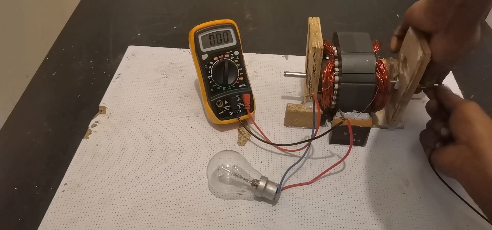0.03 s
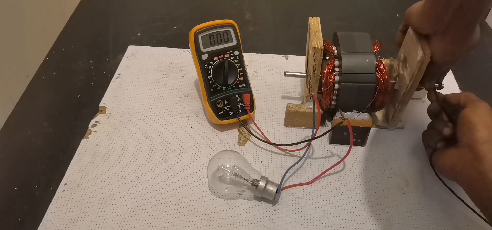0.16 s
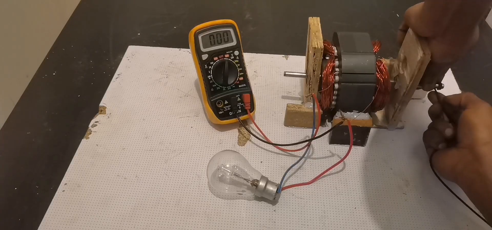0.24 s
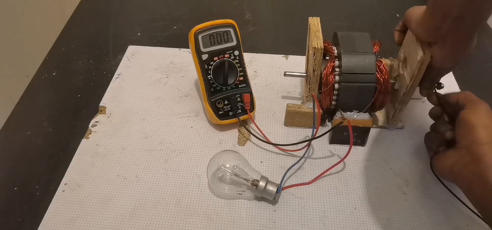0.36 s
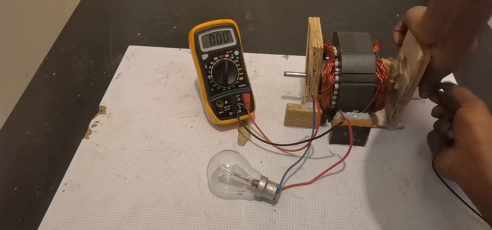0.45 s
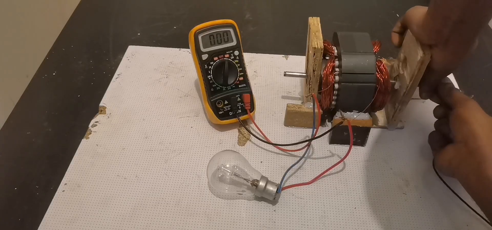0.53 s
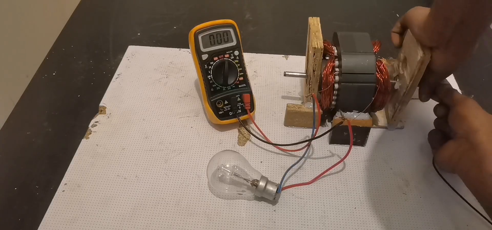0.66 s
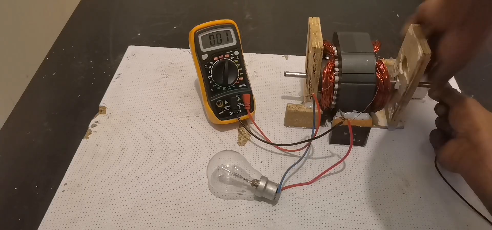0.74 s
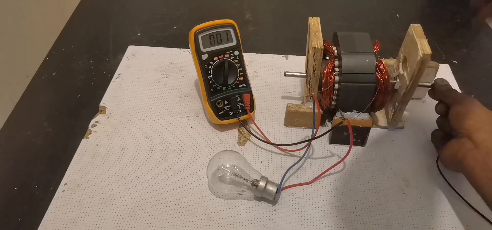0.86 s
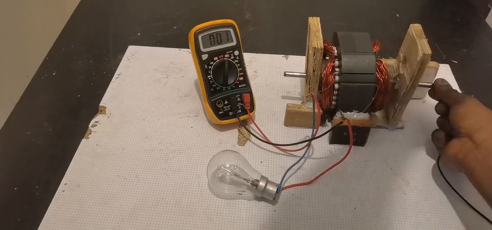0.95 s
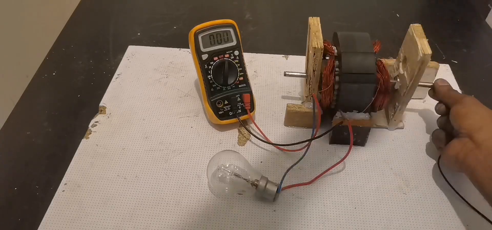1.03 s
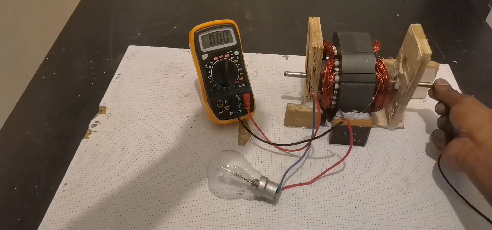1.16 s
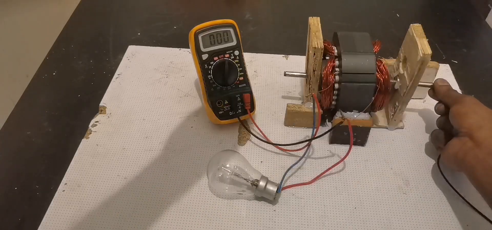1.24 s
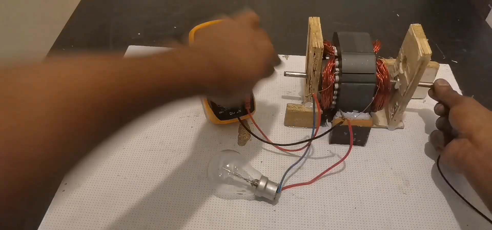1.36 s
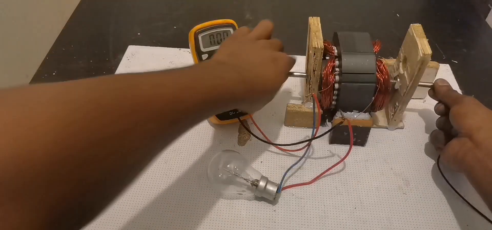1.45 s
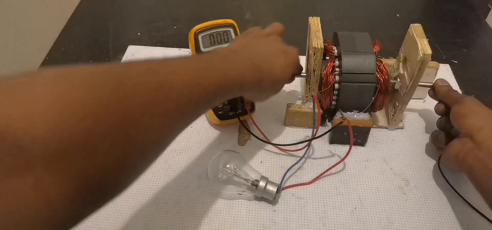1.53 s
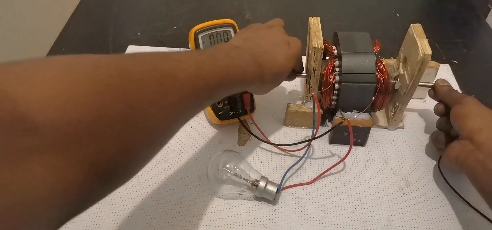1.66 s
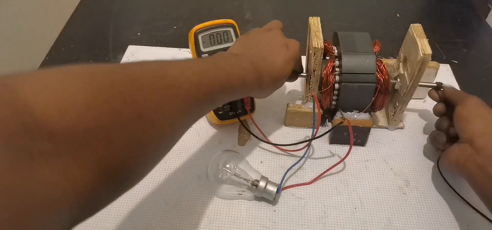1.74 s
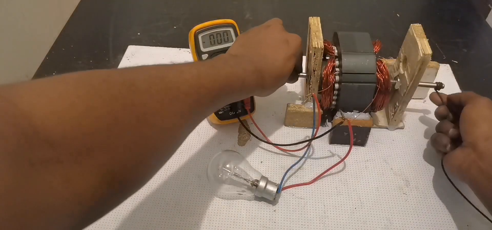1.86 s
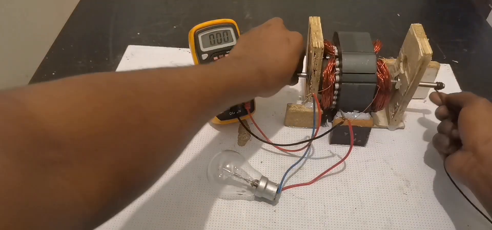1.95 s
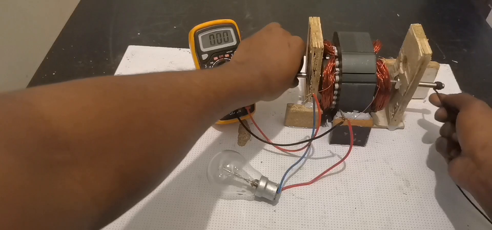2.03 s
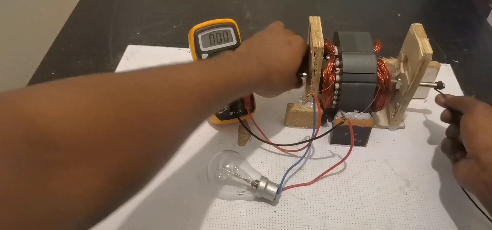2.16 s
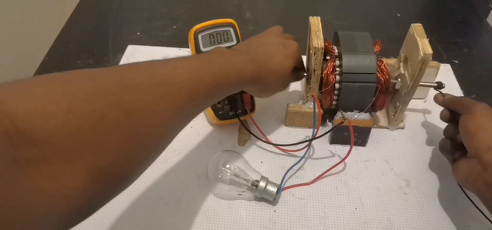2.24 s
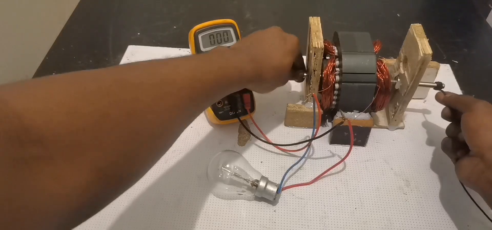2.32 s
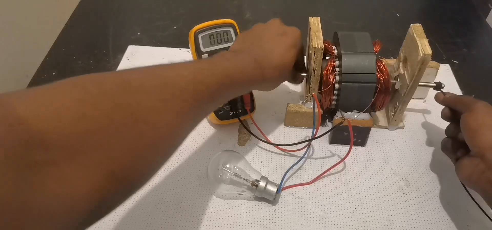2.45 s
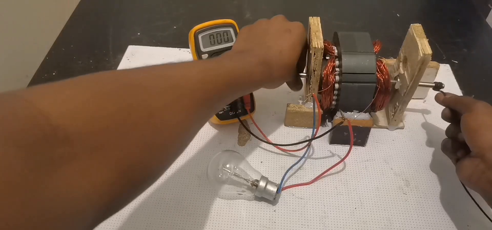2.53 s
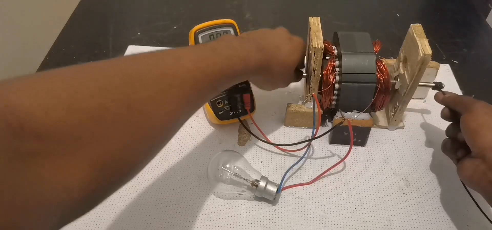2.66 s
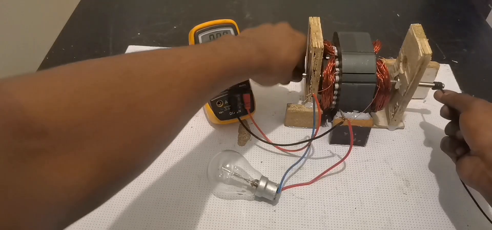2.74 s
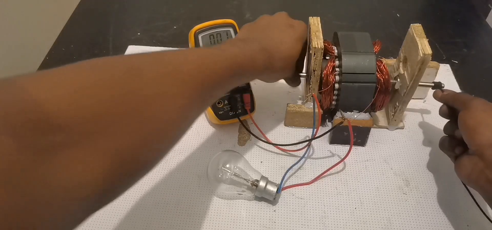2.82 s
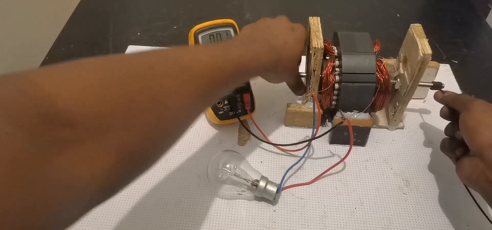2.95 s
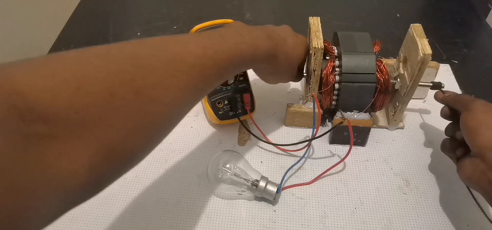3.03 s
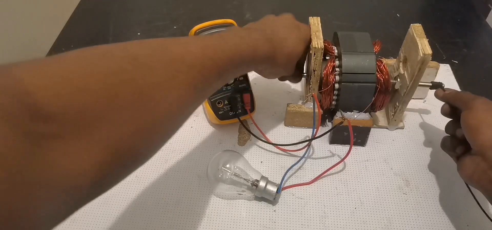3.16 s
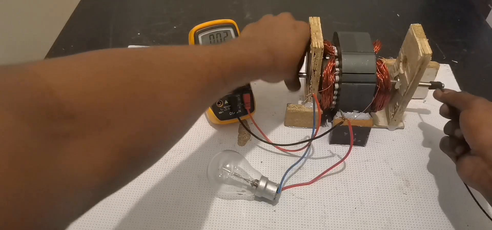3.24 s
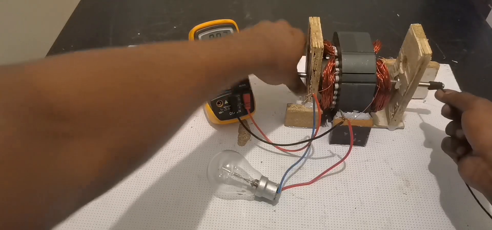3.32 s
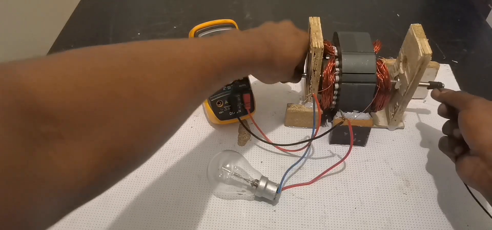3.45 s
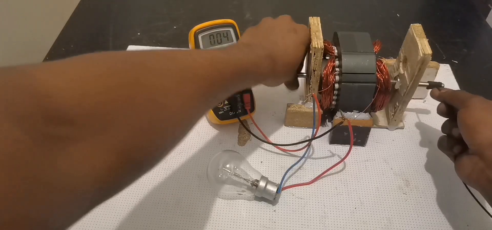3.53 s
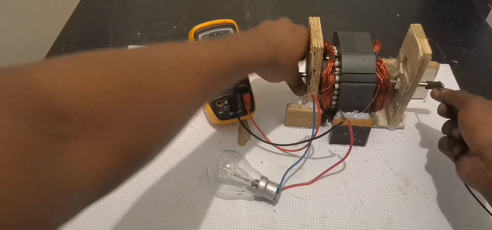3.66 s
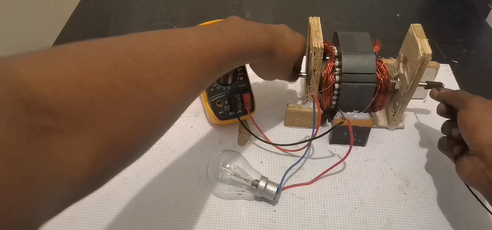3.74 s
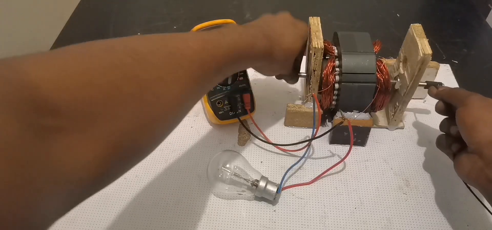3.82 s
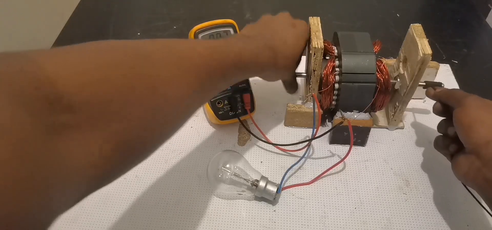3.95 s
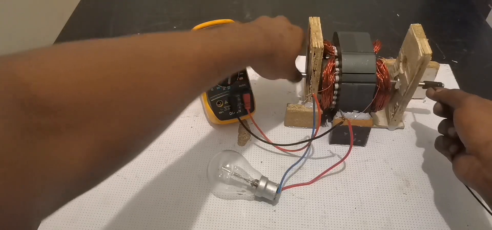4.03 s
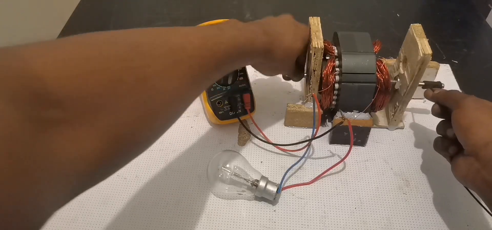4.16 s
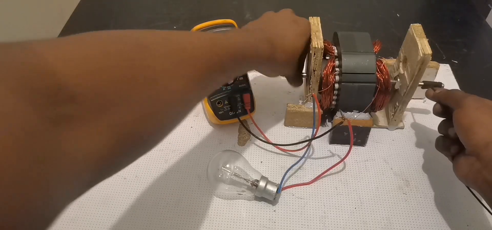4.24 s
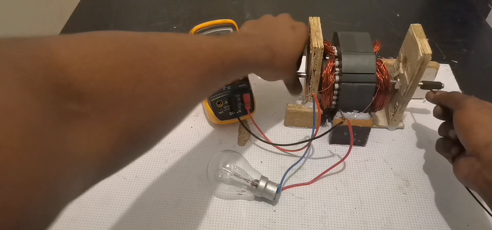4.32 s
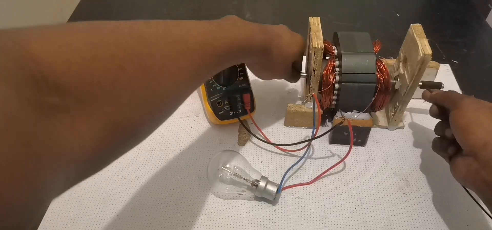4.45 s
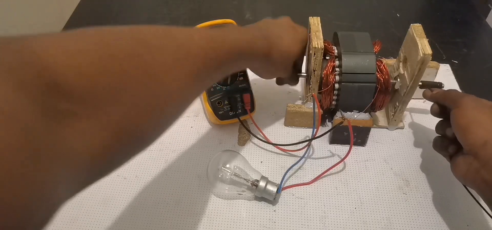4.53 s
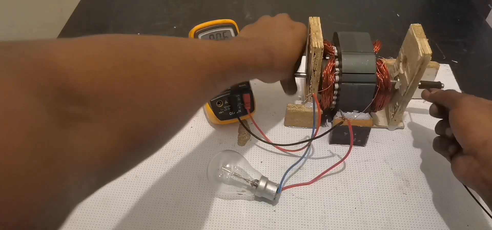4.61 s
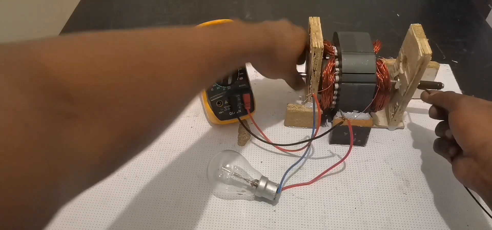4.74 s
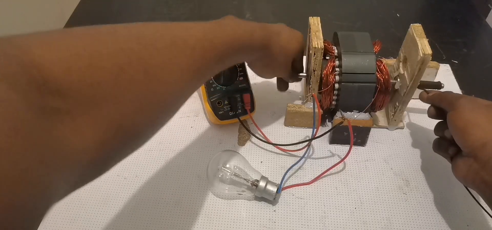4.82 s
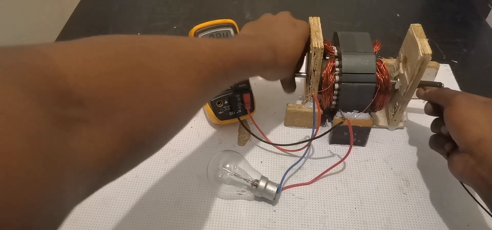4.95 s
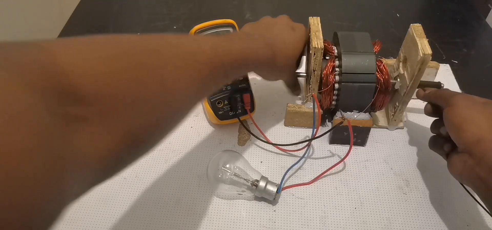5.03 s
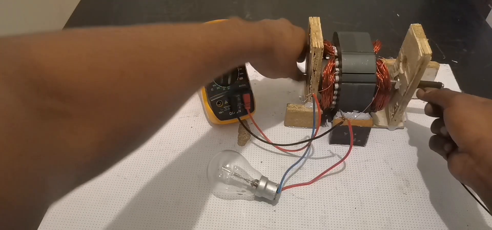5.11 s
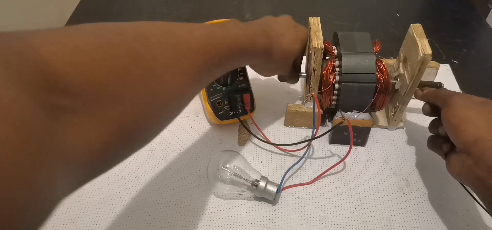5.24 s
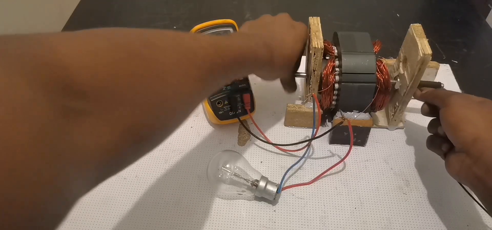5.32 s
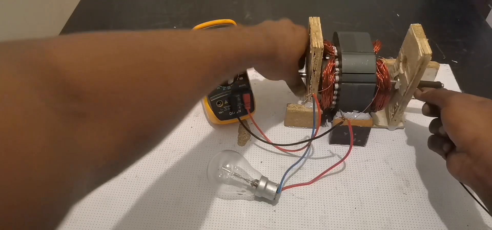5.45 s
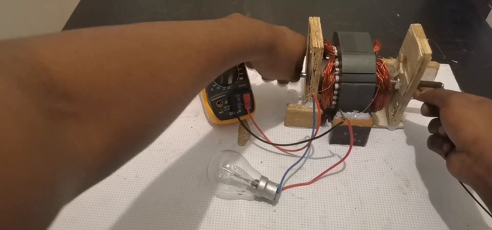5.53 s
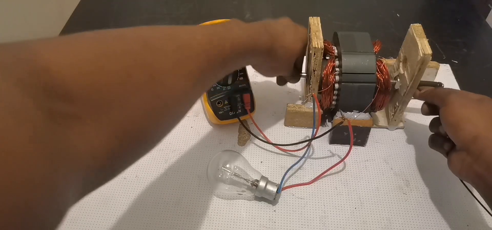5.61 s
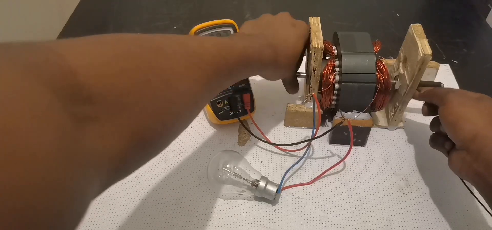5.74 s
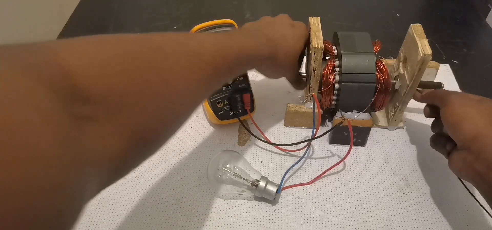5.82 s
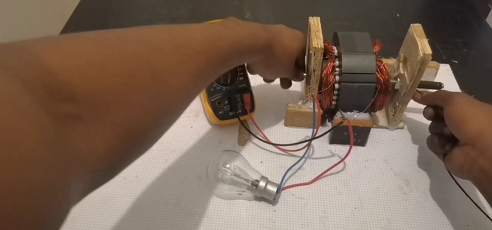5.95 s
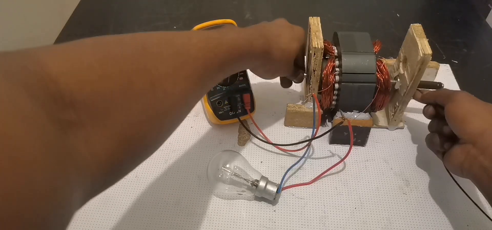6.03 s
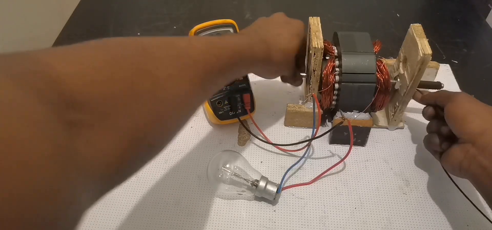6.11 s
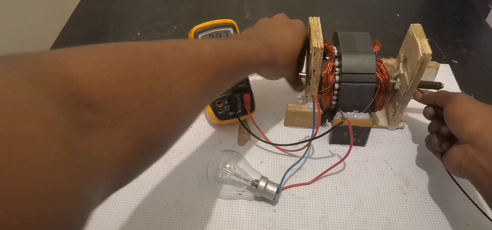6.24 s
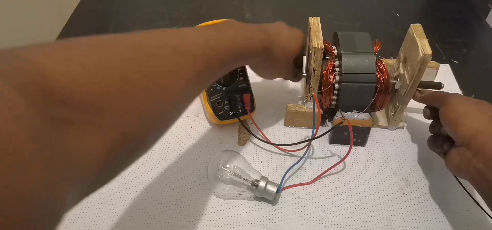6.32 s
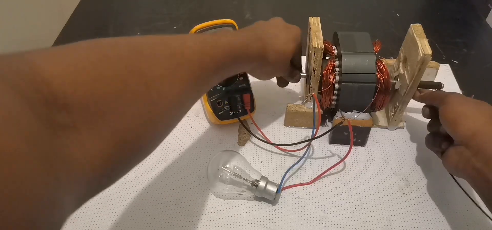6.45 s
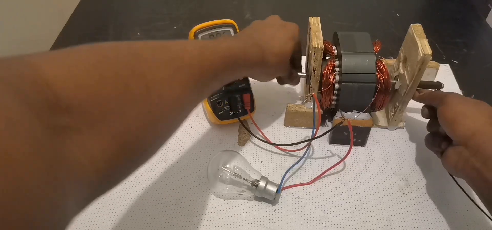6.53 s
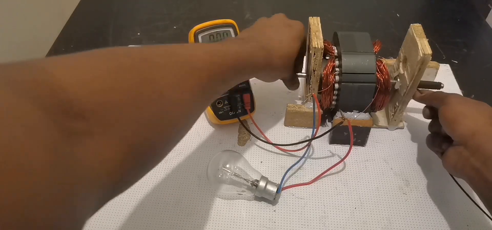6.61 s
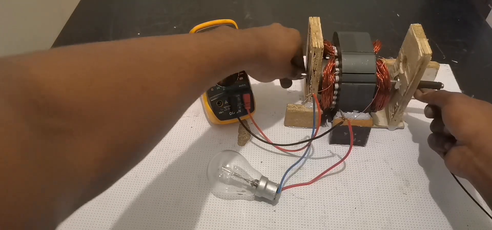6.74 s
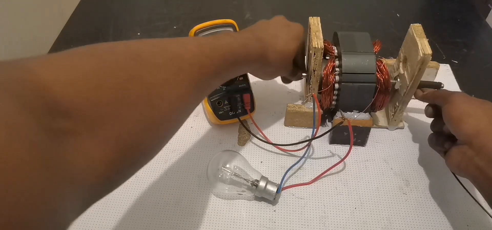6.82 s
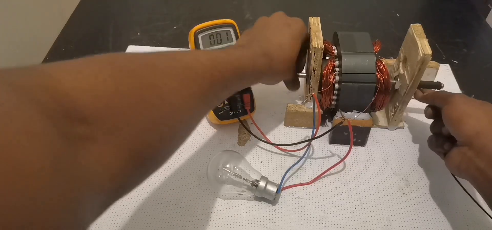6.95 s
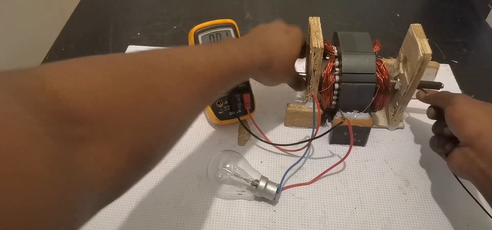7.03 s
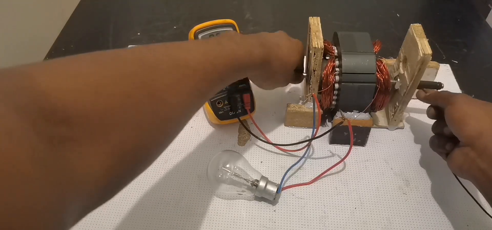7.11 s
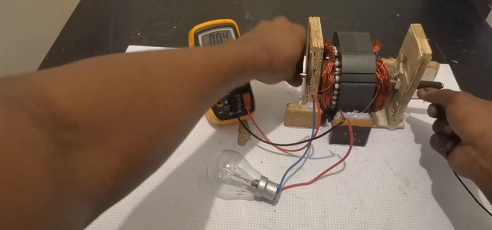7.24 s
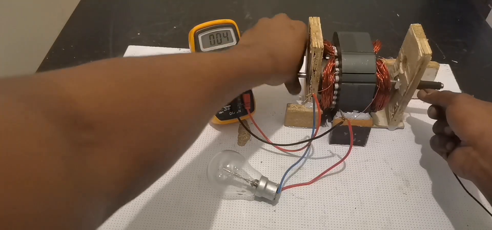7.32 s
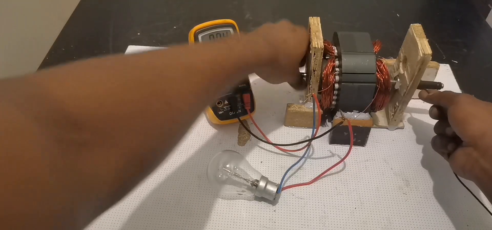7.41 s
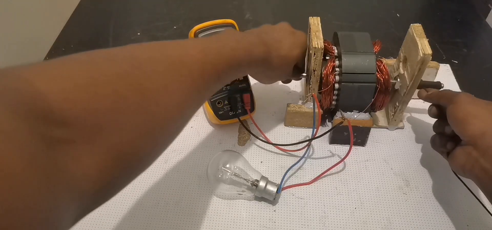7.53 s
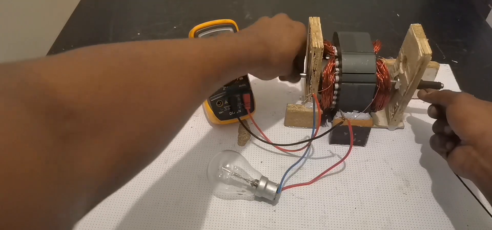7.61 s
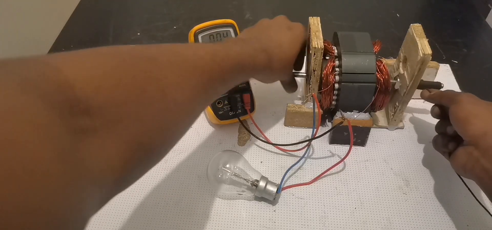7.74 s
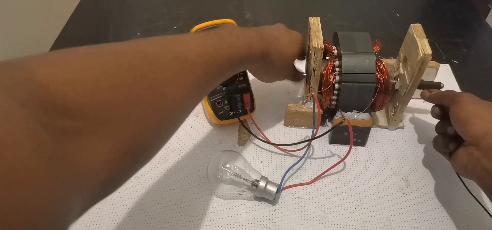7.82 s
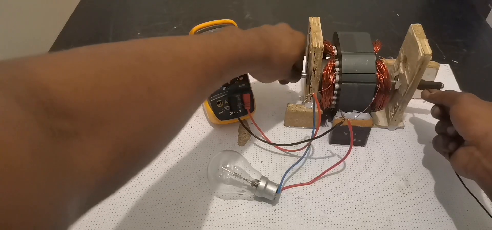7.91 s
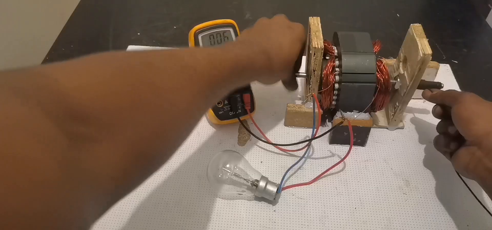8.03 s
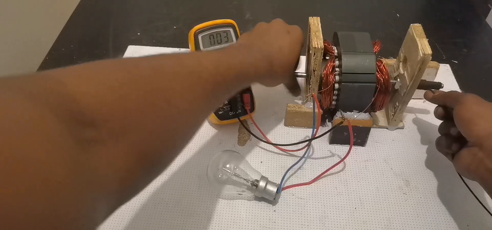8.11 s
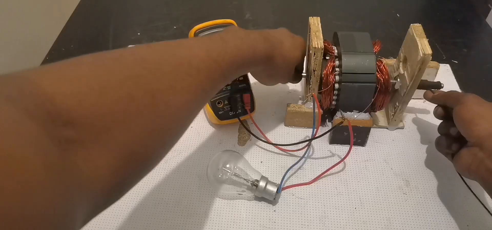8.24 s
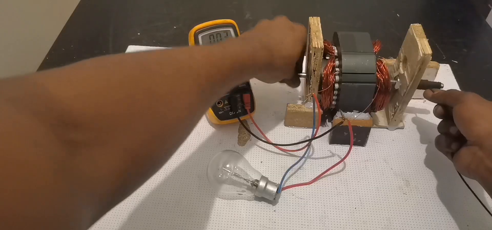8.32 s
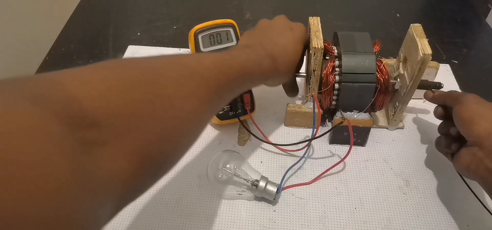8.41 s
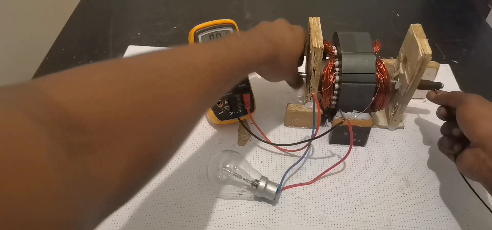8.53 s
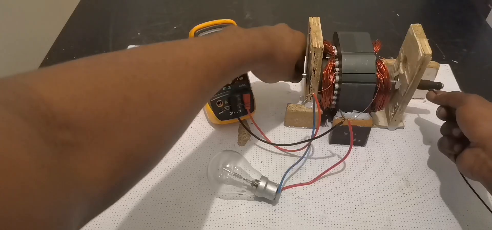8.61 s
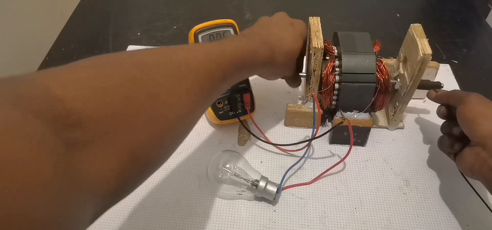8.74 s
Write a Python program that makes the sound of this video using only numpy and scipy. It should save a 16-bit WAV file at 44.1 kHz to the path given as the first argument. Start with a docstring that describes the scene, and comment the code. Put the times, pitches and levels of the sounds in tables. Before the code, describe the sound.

A small generator on a wooden frame is handled close by in a quiet room, slightly to the left. Soft thumps sound on the table around 0.4 seconds, and a metal plug clinks lightly against the frame at 0.8. A dry click follows at 1.4, then a short wooden rub and a dull bump near 2 seconds.

From about 2.5 seconds, fingers twist the shaft in an even rhythm, nearly three times a second. Each twist gives a wooden knock and a brief, rattling judder with a low boom from the table top. Skin slides off the smooth shaft with a soft hiss, and nails tick on metal now and then, most clearly around 7.4. The knocks are sharpest between 4.6 and 5.4 seconds and again near 7.3 and 8.4. A faint deep rumble comes and goes, and a low hum swells from 8.6 seconds to the end, just before 9.

```python
"""In a quiet room, fingers twist the rotor of a small generator on a wooden frame, again and again.
Each twist makes the shaft judder and catch in its wooden bores, which shakes frame and table top;
late in the twist the fingers slide off the smooth shaft with a hiss. Nails tick on metal, and early on
a metal plug is laid against the frame. A deep rumble comes and goes; a low hum swells at the end."""
import sys
import numpy as np
from scipy import signal
from scipy.fft import rfft, irfft, next_fast_len
from scipy.io import wavfile

SR = 44100
rng = np.random.default_rng(int(sys.argv[2]) if len(sys.argv) > 2 else 0)


def master_out(mix):
    """Clip the mix to full scale and print it as 16-bit PCM to the path in sys.argv[1]."""
    frames = np.transpose(np.atleast_2d(mix))
    ceiling = np.clip(frames, -1, 1)
    pcm = np.round(ceiling * 32767).astype(np.int16)
    wavfile.write(sys.argv[1], SR, pcm)


N = 386757
SIZE = next_fast_len(N + SR, real=True)
HZ = np.maximum(np.fft.rfftfreq(SIZE, 1 / SR), 1)


def from_db(db):
    """Decibels to gain."""
    return 10 ** (np.asarray(db) / 20)


def rms_one(x):
    """Scale to unit rms."""
    return x / np.sqrt(np.mean(x ** 2) + 1e-20)


def in_time(rows):
    """Columns of an automation curve at every sample."""
    s, *columns = np.transpose(rows)
    return [np.interp(np.arange(N) / SR, s, c) for c in columns]


def at_hz(points):
    """A frequency curve on every bin."""
    hz, value = np.transpose(points)
    return np.interp(np.log(HZ), np.log(hz), value)


def coloured(x, gain):
    """EQ with a gain per frequency bin."""
    return irfft(rfft(x, SIZE) * gain, SIZE)[..., :N]


def filtered(x, order, hz, kind="low"):
    """Low-pass or high-pass."""
    return signal.sosfilt(signal.butter(order, hz, kind, fs=SR, output="sos"), x)


def resonance(x, hz, width_hz):
    """Two-pole resonance with unity gain at its peak."""
    r = np.exp(-np.pi * width_hz / SR)
    poles = [1, -2 * r * np.cos(2 * np.pi * hz / SR), r * r]
    return signal.lfilter(np.array([1, 0, -1]) * (1 - r * r) / 2, poles, x)


def spread(pair, likeness):
    """Two unrelated rows become left and right spectra of a given likeness per frequency."""
    mid, side = rfft(pair, SIZE)
    alike = np.clip(at_hz(likeness), -1, 1)
    return (np.sqrt(1 + alike) * mid + np.sqrt(1 - alike) * side * [[1], [-1]]) / np.sqrt(2)


def drift(rate_hz):
    """Smooth random modulation, rms 1."""
    r = np.exp(-80 * np.pi * rate_hz / SR)   # one step per 40 samples
    slow = signal.lfilter([1], [1, -2 * r, r * r], rng.standard_normal(N // 40 + 2002))[2000:]
    return np.interp(np.arange(N) / 40, np.arange(len(slow)), rms_one(slow))


def grains(per_s, spread_db):
    """Two unrelated rows of random contacts, uneven in size and sign; rms 1."""
    chance = rng.random((2, N))
    hit = chance < per_s / SR
    out = np.zeros((2, N))
    share = chance[hit] * SR / per_s   # uniform among the contacts: rare ones are large
    out[hit] = from_db(spread_db * np.minimum(-np.log(share + 1e-9), 4))
    out.flat[::2] *= -1
    return rms_one(out)


def clicks(times, db):
    """One impulse per event."""
    out = np.full(N, 1e-18)
    out[(np.asarray(times) * SR).astype(int)] = from_db(db)
    return out


def bursts(times, db, decay_s):
    """Envelopes that start at once and die away."""
    return signal.lfilter([1], [1, -np.exp(-1 / (decay_s * SR))], clicks(times, db))


def swells(s, rise_s, hold_s, db, sag_db, rise_db, fall_db_per_s, rest_db=-np.inf):
    """Envelopes that climb to a peak, sag while held and then drop, over a resting level."""
    out = np.full(N, from_db(rest_db))
    offsets = np.arange(-SR // 2, SR)
    t = offsets / SR
    for peak_s, rise, hold, level, sag in np.broadcast(s, rise_s, hold_s, db, sag_db):
        release_db = -sag * np.clip(t / hold, 0, 1) - fall_db_per_s * np.maximum(t - hold, 0)
        shape_db = np.where(t < 0, rise_db * t / rise, release_db)
        at = int(peak_s * SR) + offsets
        inside = (at >= 0) & (at < N)
        out[at[inside]] += from_db(level + shape_db[inside])
    return out


# EQ of the room's noise bed: [f/Hz, level/dB]; table levels are relative within each layer
ROOM_EQ = [(20, -10.5), (48, -41), (81, -3), (130, -6.5), (280, -14.5), (400, -22.5), (650, -17),
           (1200, -25), (2150, -32.5), (6000, -38), (8000, -44), (10000, -61), (12400, -48), (12900, -43.5),
           (15900, -44)]
# stereo image of the bed: [f/Hz, left-right likeness]
ROOM_LIKENESS = [(30, 0.24), (100, 0.84), (300, 0.67), (640, 0.24), (1400, 0.019), (15000, .01)]
# lean to the left, full on the generator and milder on the bed: [f/Hz, left minus right/dB]
LEFT_LEAN = [(60, 1.5), (200, 2.5), (700, 2.5), (1290, 6.5), (2380, 0.5), (4400, 2.5), (10000, 3.5),
             (13000, 10.5)]
def room_tone():
    """Steady air, far rumble and microphone hiss, alike in both channels only in the bass."""
    eq = from_db(at_hz(ROOM_EQ) + at_hz(LEFT_LEAN) * np.array([[.35], [-.35]]))
    bed = irfft(spread(rng.standard_normal((2, N)), ROOM_LIKENESS) * eq, SIZE)[:, :N]
    return from_db(-55.5 + 1.7 * drift(1.0)) * rms_one(bed)


# fader ride of the deep rumble: [t/s, level/dB]
RUMBLE_RIDE = [(0.0, -59), (0.66, -56.5), (0.8, -57), (1.88, -59), (1.98, -61), (3.52, -50.5),
               (3.66, -57.5), (4.69, -53.5), (5.35, -57), (5.54, -45.5), (5.79, -55), (6.47, -53),
               (7.08, -63), (7.16, -52), (7.52, -44), (8.04, -61), (8.77, -43.5)]
def rumble():
    """Wide sub-bass noise under the lowest table mode."""
    (db,) = in_time(RUMBLE_RIDE)
    sub_band = 1 / (1 + (HZ / 50) ** 4) / (1 + (18 / HZ) ** 4)
    return from_db(db - 1.5) * rms_one(coloured(rng.standard_normal((2, N)), sub_band))


def shaking(rows, table_rest_db=-np.inf, frame_rest_db=-np.inf, lag_s=0.013):
    """Envelopes of table rumble and frame judder; the frame peaks just after the table."""
    s, rise_s, hold_s, table_db, table_sag_db, frame_db, frame_sag_db = np.transpose(rows)
    table = swells(s, rise_s, hold_s, table_db, table_sag_db,
                   rise_db=18, fall_db_per_s=271, rest_db=table_rest_db)
    frame = swells(s + lag_s, rise_s, hold_s - lag_s / 2, frame_db, frame_sag_db,
                   rise_db=25.5, fall_db_per_s=250, rest_db=frame_rest_db)
    return table, frame


# hand moves on the frame: [peak t/s, rise/s, hold/s, table level/dB, sag/dB, frame level/dB, sag/dB]
HAND_MOVES = [(.26, .06, .06, -60, 3.3, -68, 2), (.40, 0.24, 0.024, -51, 1, -55.5, 2),
              (.78, 0.07, .02, -54, 2.2, -53.5, 3), (1.70, 0.055, 0.12, -61, 1, -51, 10.4),
              (1.853, 0.031, 0.13, -43.5, 25, -40.5, 19.5), (2.03, 0.076, 0.077, -53, 3, -61, 1)]
def handling():
    """A hand takes hold of the frame and shifts on it: envelopes for table and frame."""
    return shaking(HAND_MOVES)


# a hand weighs on the table top: [t/s, level/dB, decay/s]
HAND_THUMPS = [(0.336, -26, 0.022), (.39, -27, 0.015), (2.019, -29.5, 0.036), (2.05, -34.5, 0.081)]
def thumps():
    """Soft force on the table top: flesh drives only the lowest modes."""
    weight = sum(bursts([s], db, decay_s) for s, db, decay_s in HAND_THUMPS)
    return from_db(23) * filtered(weight * rng.standard_normal((2, N)), 2, 190)


# EQ of skin on steel: [f/Hz, level/dB]
SKIN_EQ = [(710, -9.5), (1200, -6), (1960, -3.5), (2250, -8), (2460, -5), (3210, -7), (4060, -9.5),
           (6200, -11), (10000, -34.5), (12600, -34.5), (16400, -54), (22000, -120)]
# fingers slip off the shaft: [peak t/s, rise/s, hiss level/dB, air level/dB]
FINGER_SLIDES = [(.34, 0.052, -65, -70), (.78, .05, -65, -80), (2.22, 0.087, -50, -82),
                 (2.64, 0.061, -50.5, -70), (2.708, 0.1, -49, -68), (3.029, 0.19, -48, -78),
                 (3.388, 0.17, -50.5, -75), (3.708, 0.16, -52.5, -74), (4.01, 0.12, -81, -78),
                 (4.46, 0.25, -50, -76), (4.778, 0.34, -53, -76), (5.15, 0.13, -49.5, -80),
                 (5.47, 0.065, -54.5, -92), (5.91, 0.09, -58.5, -79), (6.318, 0.32, -52, -67),
                 (6.76, .15, -75, -87), (7.049, .13, -46, -59), (7.11, 0.025, -60, -63),
                 (7.16, .08, -62, -84), (7.422, 0.12, -46.5, -63), (7.499, 0.14, -60.5, -83),
                 (7.74, 0.076, -58, -70), (7.86, 0.08, -49.5, -80), (8.14, 0.084, -56.5, -69),
                 (8.208, 0.25, -56, -79), (8.41, 0.053, -77, -67), (8.548, 0.43, -56.5, -75)]
AIR_ABOVE_HZ = 12700
def finger_slides(grip, scrape, hold_s=.01):
    """Skin slides, grips and scrapes on the shaft: fine dense grains with an airy top."""
    s, rise_s, hiss_db, air_db = np.transpose(FINGER_SLIDES)
    hiss_gain = swells(s, rise_s, hold_s, hiss_db, sag_db=0, rise_db=38, fall_db_per_s=266, rest_db=-81)
    air_gain = swells(s, rise_s, hold_s, air_db, sag_db=0, rise_db=23, fall_db_per_s=370, rest_db=-83)
    hiss_gain += from_db(-22.5) * grip
    air_gain += from_db(-44) * grip
    flicker = from_db(2.0 * drift(45))
    hiss = rms_one(coloured(grains(4000, 2.8), from_db(at_hz(SKIN_EQ))))
    air = rms_one(coloured(rng.standard_normal((2, N)), HZ > AIR_ABOVE_HZ))
    return (flicker * hiss_gain + scrape) * hiss + (flicker * air_gain + scrape * from_db(-20)) * air


# the shaft catches in its bores, hands knock the frame: [t/s, level/dB, table send/dB]
WOOD_KNOCKS = [(0.539, -48.5, -4), (0.759, -38, -21), (1.421, -64, -11), (1.707, -47, -17), (1.856, -44, 8),
               (2.145, -36, -5), (2.488, -35, -6), (2.706, -35, -8), (2.84, -35, -3), (2.867, -31.5, 12.5),
               (3.586, -24.5, -5), (3.873, -44.5, 6), (4.247, -39.5, 9), (4.278, -31.5, 15),
               (4.639, -18.5, -4.5), (4.913, -44, 18), (4.974, -32, -1), (4.994, -20, -7), (5.369, -19, 9),
               (5.796, -26, 1), (6.145, -28.5, -5.5), (6.598, -44, 20), (6.933, -36, 12.5),
               (7.043, -39, -13), (7.321, -21, -5.5), (7.65, -38, 3), (8.062, -22.5, -10),
               (8.34, -43.5, 10), (8.4, -24.5, -14), (8.426, -18, -22), (8.72, -41, 10)]
def knocks(creeping, attack_s=0.0016):
    """Forces on table and frame: each catch is a blow and a dying rasp; the creeping shaft rasps too."""
    s, db, table_send_db = np.transpose(WOOD_KNOCKS)
    bite = np.exp(-1 / (attack_s * SR))
    rasp = signal.lfilter([1 - bite], [1, -bite], bursts(s, db + 13.5, decay_s=0.023))
    catches = grains(1500, 2.3) * (rasp + creeping) + clicks(s, db + 28.5)
    bright = filtered(catches, 1, 1500, "high")   # a catch favours the upper modes
    return clicks(s, db + table_send_db + 32.5), bright


# nails and skin catch on metal: [t/s, ring level/dB, f/Hz, scrape level/dB]
NAIL_TICKS = [(0.5447, -57, 4400, -67), (2.1969, -45, 2840, -62), (2.637, -34, 4840, -63),
              (3.327, -47, 2510, -52), (3.3812, -43, 2580, -51), (4.4287, -37, 4920, -46.5),
              (5.1048, -32, 3130, -60), (5.4596, -38, 4170, -50), (5.9093, -39.5, 4370, -50.5),
              (6.305, -32, 5700, -44), (6.7066, -46, 4150, -60.5), (7.04, -31, 3960, -37.5),
              (7.1057, -32, 2520, -42), (7.393, -35, 3040, -70), (7.42, -23, 2530, -39.5),
              (7.858, -34, 2460, -61), (8.4233, -50, 2520, -78)]
def nail_ticks():
    """Each tick and the rub after it ring the metal at their own pitch."""
    out = np.zeros(N)
    t = np.arange(SR // 5) / SR
    rub_shape = np.exp(-t / 0.019) - np.exp(-t / 0.0035)
    for s, db, hz, _ in NAIL_TICKS:
        tick = from_db(db + 21.5) * (t == 0)
        rub = from_db(db + 5) * rng.standard_normal(len(t)) * rub_shape
        out[int(s * SR):][:len(t)] += resonance(tick + rub, hz, 0.04 * hz)
    return out


def scrapes():
    """Envelope of the short scrape after each tick; the skin takes a few ms to bite."""
    s, _, _, db = np.transpose(NAIL_TICKS)
    return signal.lfilter([.006], [1, -.994], bursts(s, db + 3, decay_s=.011))


# dry snaps: [t/s, level/dB]
DRY_SNAPS = [(.7553, -22), (1.4216, -16), (5.4601, -20), (8.392, -27)]
def snaps():
    """Broadband clicks in the colour of the finger hiss."""
    eq = from_db(at_hz(SKIN_EQ)) + from_db(-25) * (HZ > AIR_ABOVE_HZ)
    return coloured(clicks(*np.transpose(DRY_SNAPS)), eq)


# the plug touches the frame: [t/s, level/dB]
PLUG_HITS = [(.7555, -46), (.765, -61), (.778, -54), (.8, -56)]
# ring of the plug: [f/Hz, width/Hz, level/dB]
PLUG_MODES = [(710, 39, 8.5), (910, 39, 7), (1160, 50, -14), (2250, 16, 4.5), (5600, 220, -3),
              (6540, 120, -6.5)]
def plug():
    """A metal plug is laid against the frame; each tap rings its modes."""
    taps = clicks(*np.transpose(PLUG_HITS))
    return sum(resonance(taps * from_db(db + 41.5), hz, width) for hz, width, db in PLUG_MODES)


# turns of the rotor: [peak t/s, rise/s, hold/s, table level/dB, sag/dB, frame level/dB, sag/dB]
SHAFT_TWISTS = [(2.217, 0.14, 0.082, -61, 2, -70, 1), (2.527, 0.073, .11, -34.5, 11.5, -49.5, 2.5),
                (2.891, 0.062, 0.13, -31.5, 3, -36, 8.5), (3.244, 0.086, 0.16, -36, 0, -43, 7),
                (3.587, 0.068, 0.16, -30.5, 9, -36, 15), (3.962, 0.11, 0.12, -33.5, 9.5, -37.5, 17.5),
                (4.298, 0.064, 0.16, -34, 5, -40, 8), (4.646, 0.09, 0.19, -34.5, 3.5, -37, 13),
                (5.003, .1, 0.19, -30.5, 11.5, -36, 15.5), (5.417, 0.16, 0.13, -32, 7.5, -36.5, 16.5),
                (5.769, 0.11, 0.13, -31.5, 11, -39.5, 16.5), (6.174, 0.065, 0.11, -34.5, 3, -41, 6),
                (6.576, 0.061, 0.086, -42, -0.5, -54, -6.5), (6.921, .05, 0.16, -32.5, 7, -38, 9),
                (7.314, 0.067, 0.11, -31.5, 5.5, -36.5, 11.5), (7.696, 0.098, 0.18, -34, 10, -39.5, 14.5),
                (8.046, 0.055, 0.17, -33, 1, -38, 9), (8.44, 0.13, 0.16, -33, 6, -39.5, 11.5),
                (8.76, 0.065, 0.046, -53, -9, -49, 4)]
def twists():
    """Each twist shakes table and frame: envelopes over the faint floor of an idle hand."""
    return shaking(SHAFT_TWISTS, table_rest_db=-70.5, frame_rest_db=-75.5)


# fingers take hold again before a twist: [t/s, length/s, level/dB]
SHAFT_CREEPS = [(3.515, 0.046, -57), (3.87, 0.067, -55), (4.25, 0.035, -48.5), (4.567, 0.076, -50.5),
                (4.924, .07, -50), (5.31, .07, -46.5), (5.69, 0.066, -49), (6.528, 0.085, -55),
                (7.25, .04, -60)]
def creep():
    """Envelope of the rasp as the shaft creeps in its bores."""
    s, length_s, db = np.transpose(SHAFT_CREEPS)
    return swells(s, rise_s=0.02, hold_s=length_s, db=db + 22, sag_db=0, rise_db=22, fall_db_per_s=203)


# pitch and fader ride of the closing hum: [t/s, f/Hz, level/dB]
HUM_RIDE = [(8.55, 87.7, -57), (8.572, 86, -47), (8.58, 83, -74), (8.606, 87, -41), (8.642, 89.6, -37.5),
            (8.708, 75, -40.5), (8.77, 80, -35.5)]
def hum(fade_s=0.026):
    """A low near-sine with a weak second partial."""
    hz, db = in_time(HUM_RIDE)
    phase = 2 * np.pi * np.cumsum(hz) / SR
    fade_in = np.clip((np.arange(N) / SR - HUM_RIDE[0][0]) / fade_s, 0, 1)
    return fade_in * from_db(db + 2.5) * (np.sin(phase) + 0.22 * np.cos(2 * phase))


def body(modes, force, wander_db):
    """The force rings the modes; the contact point wanders, so each mode's share drifts."""
    out = np.zeros((2, N))
    for k, (hz, width, db) in enumerate(modes):
        polarity = np.array([[1], [(-1) ** (k // 2)]]) * (-1) ** k
        share = from_db(db + wander_db * drift(8.3)) * polarity
        out += resonance(force * share, hz, width)
    return out


# boom of the table top: [f/Hz, width/Hz, level/dB]
TABLE_MODES = [(84, 14, -16), (140, 20, -10), (166, 20, -10), (200, 24, -8), (228, 24, -1), (246, 24, -5),
               (280, 35, -12), (341, 18, -8), (380, 24, -13), (470, 40, -15)]
# woody midrange of the frame: [f/Hz, width/Hz, level/dB]
FRAME_MODES = [(529, 57, -7.5), (640, 64, -7), (712.4, 50, -3.5), (838, 88, -4), (918, 128, -1),
               (1096, 181, 0.5), (1106, 102, -5), (1241, 107, -3.5), (1294, 213, -5), (1539, 100, -5.5),
               (1664, 174, -13.5), (1987, 130, -21), (2350, 170, -36.5)]
def wood(table_shake, frame_shake):
    """Shaft judder, hands and knocks ring the table top and the frame."""
    pressed, rubbed = handling()
    clumps = from_db(1.27 * drift(43.0))   # the judder comes in clumps
    table_force = grains(600, 1.35) * clumps * (table_shake + pressed) * from_db(28) + thumps()
    table_knocks, frame_knocks = knocks(creep())
    judder = grains(1800, 2.6) * clumps * from_db(21)
    hand_rub = filtered(judder * rubbed, 4, 1260)   # skin on wood is a duller contact than steel
    table = body(TABLE_MODES, table_force + table_knocks, wander_db=2.1)
    frame = body(FRAME_MODES, judder * frame_shake + hand_rub + frame_knocks, wander_db=1.5)
    return filtered(table + frame, 4, 2500)   # wood on steel is a soft contact


# stereo image of wood and fingers: [f/Hz, left-right likeness]
SOURCE_LIKENESS = [(60, 0.94), (200, 1), (400, 0.76), (900, 0.95), (3000, 0.27), (10000, 0.23),
                   (13000, .05)]
RIGHT_LAG_S = 0.000456   # the right microphone is further from the frame
ROOM_T60_S, ROOM_DB, WALL_LOW_CUT_HZ, WALL_HIGH_CUT_HZ = .16, -9, 400, 8000
def to_microphones(wide, point):
    """Each side hears other parts of a wide source, all of a point source; the walls add a short tail."""
    t = np.arange(SR // 2) / SR
    tail = rng.standard_normal((2, len(t))) * from_db(-60 * t / ROOM_T60_S) * (t > .003)
    walls = rfft(rms_one(tail) / np.sqrt(len(t)), SIZE) * from_db(ROOM_DB)
    walls /= (1 + 1j * HZ / WALL_HIGH_CUT_HZ) * (1 - 1j * WALL_LOW_CUT_HZ / HZ)
    lag = RIGHT_LAG_S / (1 + (800 / HZ) ** 4)   # bass leaves the whole table top, on both sides at once
    direct = np.exp(-2j * np.pi * HZ * lag * [[0], [1]])
    balance = from_db(at_hz(LEFT_LEAN) * np.array([[.5], [-.5]]))
    sources = spread(wide, SOURCE_LIKENESS) + rfft(point, SIZE)
    return irfft(sources * (direct + walls) * balance, SIZE)[:, :N]


def scene():
    """Wood and fingers play wide, metal and snaps as a point, over hum, rumble and room tone."""
    table_shake, frame_shake = twists()
    wide = wood(table_shake, frame_shake) + finger_slides(grip=frame_shake, scrape=scrapes())
    metal = filtered(nail_ticks() + plug(), 4, 7500)
    return to_microphones(wide, metal + snaps()) + hum() + rumble() + room_tone()


def record(dry):
    """Soft clipping rounds the peaks; a steep low-pass cuts the top."""
    rounded = .16 * np.tanh(dry / .16)
    return signal.sosfilt(signal.ellip(10, .5, 70, 15800, fs=SR, output="sos"), rounded)


dry = scene()
out = record(dry)
master_out(out)
```